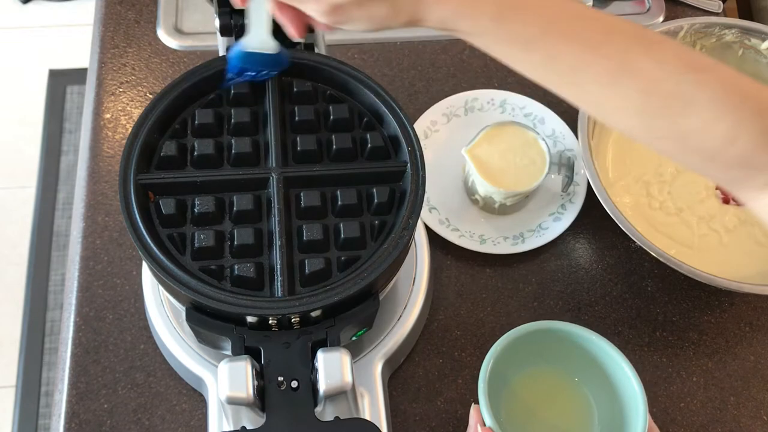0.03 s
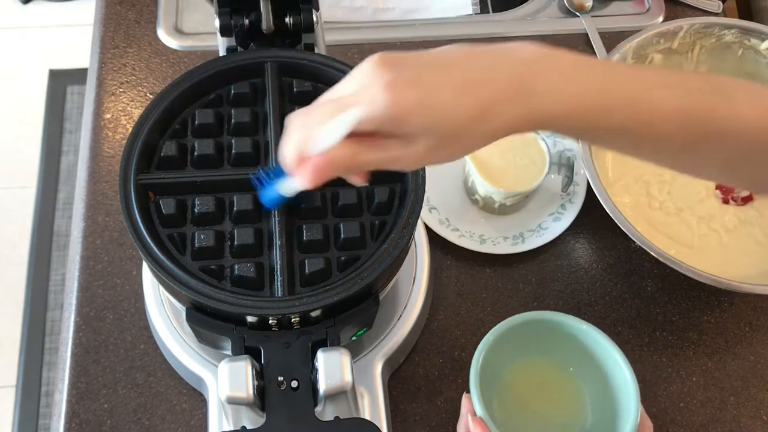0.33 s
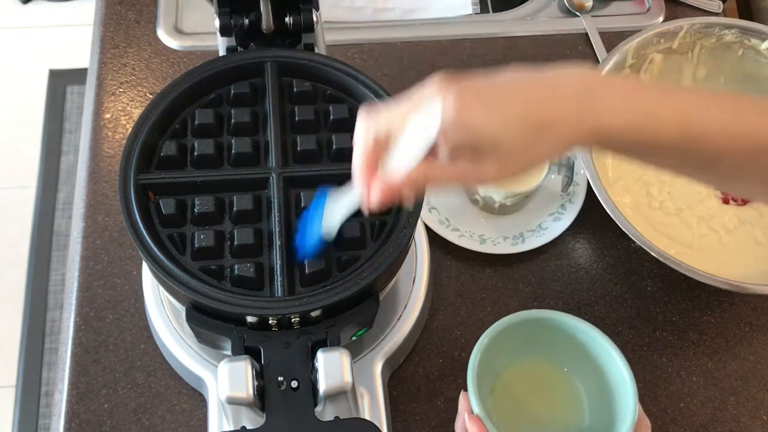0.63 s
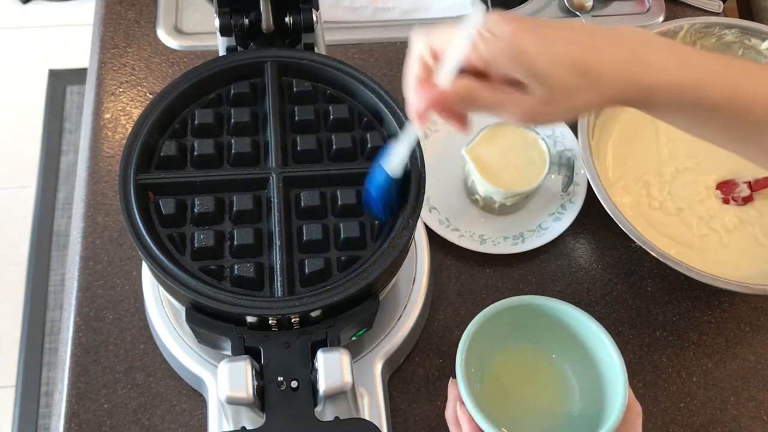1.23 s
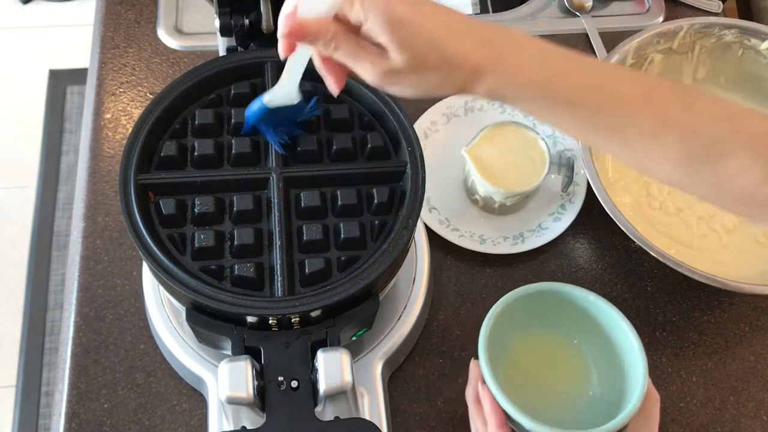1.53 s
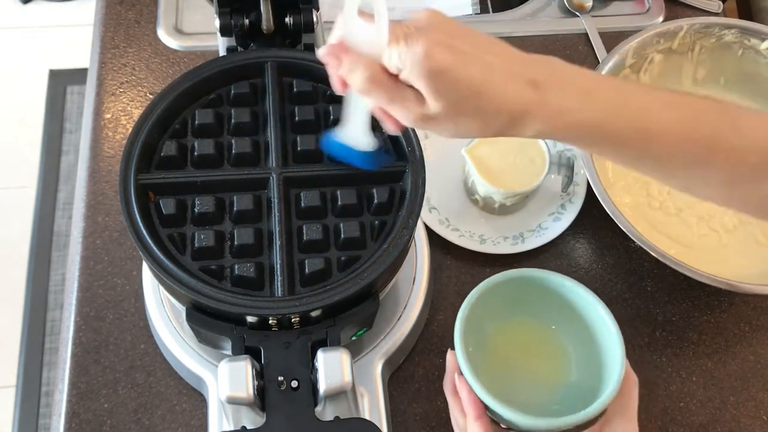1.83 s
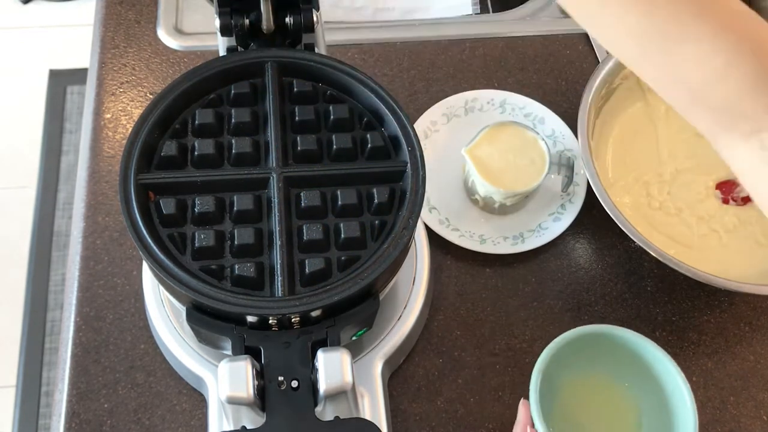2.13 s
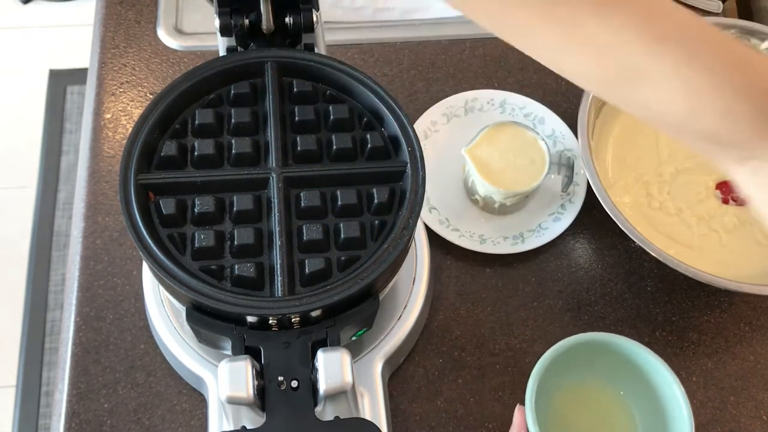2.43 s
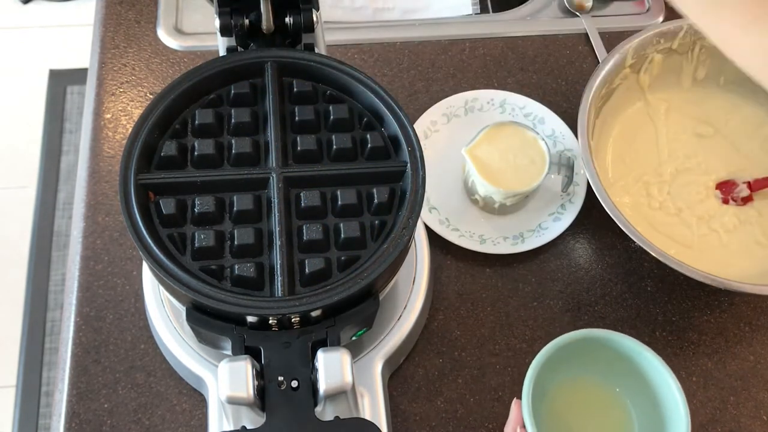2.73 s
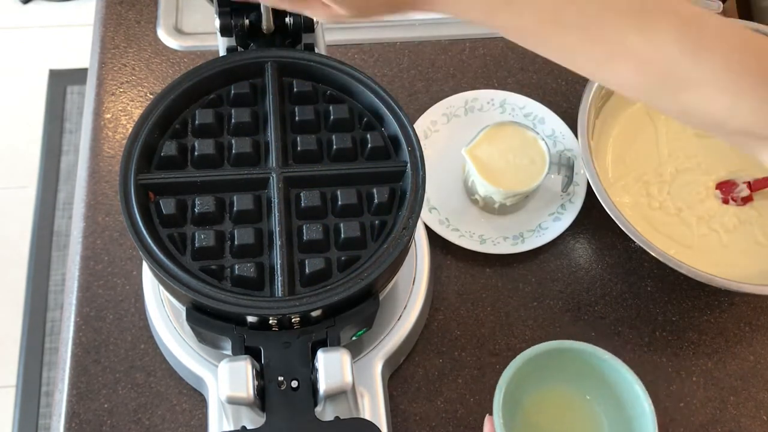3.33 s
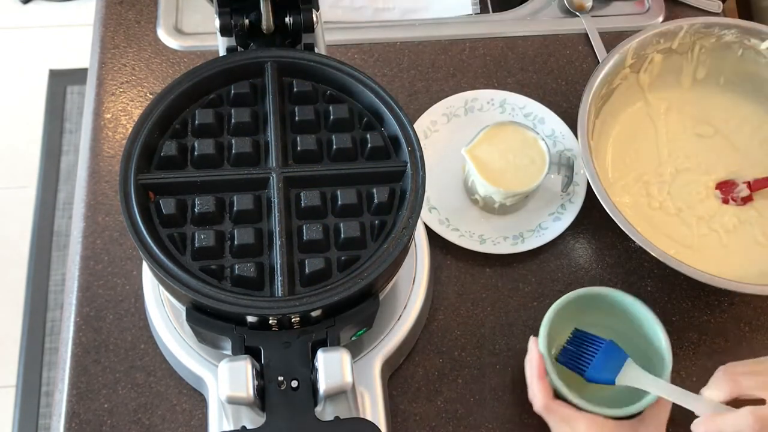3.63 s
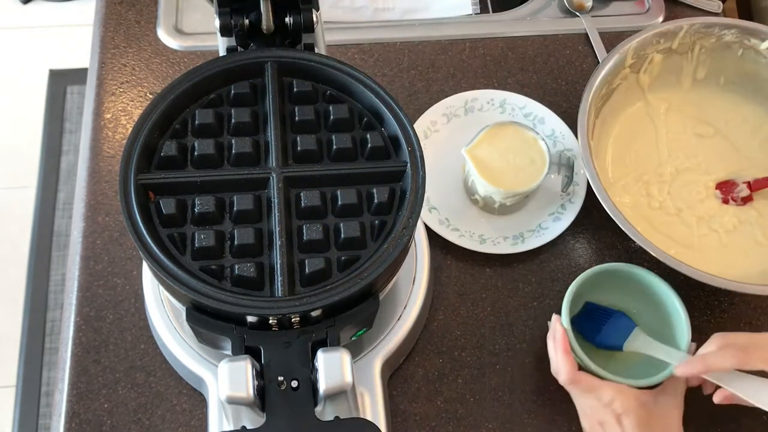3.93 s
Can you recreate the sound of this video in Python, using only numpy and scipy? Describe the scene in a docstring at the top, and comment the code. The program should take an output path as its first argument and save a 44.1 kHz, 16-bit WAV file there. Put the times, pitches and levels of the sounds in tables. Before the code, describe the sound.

A silicone brush dabs oil on a waffle iron with soft wet swishes, then scrubs more crisply over a faint appliance hum. A ceramic bowl lands on the kitchen counter with a louder, hollow knock, close to the microphone.

```python
"""A kitchen, one microphone close above the counter. Over a low room rumble, a silicone brush dabs oil
on the grid of a waffle iron: soft wet swishes, and bristles flicking off the ridges. From about 1.7 s a
crisper, drier scrubbing takes over for two seconds, above the whirr and hum of an appliance.
Near 3.9 s a ceramic bowl is set down on the counter with a hollow knock,
and the brush taps it lightly twice."""
import sys
import numpy as np
from scipy import signal
from scipy.fft import rfft, irfft
from scipy.io import wavfile
from scipy.ndimage import uniform_filter1d

SR = 44100
rng = np.random.default_rng(int(sys.argv[2]) if len(sys.argv) > 2 else 0)


def output_pcm(signal):
    """Save a mono or channel-first signal as 16-bit PCM at the path in sys.argv[1].

    Samples are clipped to [-1, 1] before scaling.
    """
    pcm = np.clip(np.atleast_2d(signal).T, -1, 1) * 32767
    wavfile.write(sys.argv[1], SR, np.round(pcm).astype(np.int16))


N = 176400
TIME = np.arange(N) / SR
HZ = np.fft.rfftfreq(N, 1 / SR)


def amp(db):
    """Decibels to gain."""
    return 10 ** (np.asarray(db) / 20)


def unit(x):
    """Scales to rms 1."""
    return x / np.sqrt(np.mean(x ** 2) + 1e-20)


def value_at(points, hz):
    """Interpolates (Hz, value) points over log frequency."""
    freqs, values = np.transpose(points)
    return np.interp(np.log(hz + 1), np.log(freqs + 1), values)


def colour(x, spectrum):
    """Filters x by (Hz, dB) points, at rms 1."""
    return unit(irfft(rfft(x) * amp(value_at(spectrum, HZ)), N))


def noise(spectrum):
    """Steady coloured noise at rms 1."""
    return colour(rng.standard_normal(N), spectrum)


def drift(rate_hz):
    """Random wander below rate_hz, at rms 1."""
    return unit(irfft(rfft(rng.standard_normal(N)) / (1 + (HZ / rate_hz) ** 4), N))


def cut(x, kind, hz, order=2):
    """Butterworth "low" or "high" pass."""
    return signal.sosfilt(signal.butter(order, hz, kind, fs=SR, output="sos"), x)


def resonate(x, hz, width_hz):
    """One resonance of gain 1; its pitch may move."""
    turn = np.exp(2j * np.pi * np.cumsum(hz * np.ones(N)) / SR)
    pole = np.exp(-np.pi * width_hz / SR)
    return 2 * (turn * signal.lfilter([1 - pole], [1, -pole], x / turn + 1e-18)).real


def swell(peak, rise, fall, skirt=1.31):
    """Pressure of one stroke: it builds, peaks and lets go."""
    t = TIME - peak
    from_peak = abs(t / np.where(t < 0, rise, fall))
    return np.exp(-.5 * np.minimum(from_peak, 20) ** skirt)


def burst(start, decay):
    """A sudden start and an exponential fall."""
    return (TIME >= start) * np.exp(-np.clip((TIME - start) / decay, 0, 20))


def die_away(x, start):
    """Lets each band fade at the kitchen's own rate."""
    # Each row: frequency in Hz, seconds to fall 60 dB.
    room_t60 = [(100, 0.75), (500, 0.45), (2000, 0.71), (6000, 0.29), (16000, 0.27)]
    hz, t, bands = signal.stft(x, SR, nperseg=256)
    fade = 10 ** (-3 * np.maximum(t - start, 0) / value_at(room_t60, hz)[:, None])
    return signal.istft(bands * fade, SR, nperseg=256)[1][:len(x)]


def kitchen(x, wet_db):
    """Adds diffuse reflections, reaching the microphone from 3 ms after the direct sound."""
    tail = die_away(rng.standard_normal(SR // 2), 0) * (TIME[:SR // 2] > .003)
    return x + amp(wet_db) * signal.fftconvolve(x, tail / np.linalg.norm(tail))[:N]


def hum(hz, waver, waver_hz, sway_rad, sway_hz):
    """A tone at rms 1 whose level wavers and whose phase sways."""
    level = 1 + waver * drift(waver_hz)
    return unit(level * np.sin(2 * np.pi * hz * TIME + sway_rad * drift(sway_hz)))


def room_rumble():
    """The quiet kitchen: low noise and mains hum."""
    # Each row: frequency in Hz, relative level in dB.
    spectrum = [(20, -20), (40, -7), (60, -12), (85, -4), (150, -6.5), (250, -3), (400, -12), (700, -15.5),
                (1500, -18.5), (4000, -25.5), (16000, -32)]
    rumble = amp(-59.5) * noise(spectrum)
    return rumble + amp(-61.5) * hum(58.3, waver=.3, waver_hz=12, sway_rad=.76, sway_hz=3.9)


def appliance(rise_s=.4):
    """A fan whirrs, and two humming tones come in one after the other."""
    # Each row: frequency in Hz, relative level in dB.
    fan_spectrum = [(50, -58), (95, -8), (130, -13), (190, -2), (270, -11), (480, -13), (700, -7),
                    (1100, -12), (1500, -20.5), (4000, -24.5), (9000, -29), (16000, -32)]
    # Each row: pitch in Hz, level in dB, time in seconds when it is fully there.
    hum_tones = [(174.8, -63.5, 1.75), (357, -69, 2.37)]
    tones = np.zeros(N)
    for hz, db, full in hum_tones:
        level = amp(db) * np.clip(1 + (TIME - full) / rise_s, 0, 1)
        tones += level * hum(hz, waver=.27, waver_hz=1.9, sway_rad=.27, sway_hz=4.8)
    return amp(-59.5) * noise(fan_spectrum) + tones


def background(on_s=1.684, off_s=3.653, fade_s=.068):
    """At 1.68 s the background changes abruptly from the quiet rumble to a whirr and hum, and at 3.65 s the
    rumble is back; the level dips at each change."""
    def fade_in(start):
        return np.clip((TIME - start) / fade_s + .029, 0, 1) * (TIME > start)
    rumble = room_rumble() * ((TIME < on_s) + fade_in(off_s))
    return rumble + appliance() * fade_in(on_s) * (TIME < off_s)


def ceramic_ring(start, db):
    """The bowl's thin high ring after one touch."""
    # Each row: pitch in Hz, level relative to the touch in dB, seconds to fall 60 dB.
    modes = [(1880, -20, .25), (7800, -25, .08), (12930, -38, .22)]
    return sum(amp(db + mode_db) * burst(start, t60 / np.log(1000))
               * np.sin(2 * np.pi * hz * (TIME - start)) for hz, mode_db, t60 in modes)


def bowl_taps(decay_s=.0014):
    """The brush ticks against the bowl, which rings faintly."""
    # Each row: start in seconds, level in dB.
    taps = [(3.961, -25), (3.976, -28)]
    # Each row: frequency in Hz, relative level in dB.
    tick_spectrum = [(500, -33), (1800, 6.5), (2700, 1), (4000, 1), (5500, 4.5), (7000, -4), (7800, 1),
                     (9000, -6), (16000, -27)]
    tick = noise(tick_spectrum)
    return sum(amp(db) * burst(start, decay_s) * tick + ceramic_ring(start, db) for start, db in taps)


def bowl_knock(attack_s=.001, clack_hz=930, clack_s=.0008, tail_rise_s=.0022):
    """The bowl lands with a clack, rocks and grates briefly; the counter and room ring."""
    # Each row: start in seconds, strength in dB, contact time in seconds.
    blows = [(3.8586, -13.5, 0.00026), (3.867, -15.5, 0.0013), (3.888, -25.5, 0.00083)]
    # Bowl and counter together. Each row: pitch in Hz, relative level in dB, seconds to fall 60 dB.
    modes = [(215.3, -21.5, 0.33), (292, -8, 0.56), (360, -12, 0.36), (534.6, -7, 0.37), (600, -4, 0.11),
             (684, -19, 0.21), (843, -17, 0.21), (944, -23, 0.14), (1077, -21, 0.06), (1168, 0, 0.026),
             (1350, -21.5, 0.21), (2105, -13.5, 0.048), (3950, -4, 0.021)]
    # The room's ring and the grating. Each row: frequency in Hz, relative level in dB.
    tail_spectrum = [(40, -22), (95, -6), (160, -9), (270, 4.5), (430, 2.5), (540, 7.5), (850, 0),
                     (1200, -7), (1550, -12.5), (2100, -19.5), (6500, -28.5), (16000, -51)]
    grit_spectrum = [(1000, 2), (2000, 6.5), (4500, 4), (7800, -6), (8900, 3.5), (10300, -16), (11500, -5),
                     (16000, -16)]
    landing, hollow = blows[0][0], np.zeros(N)
    for start, db, contact in blows:
        t = np.maximum(TIME - start, 0)
        blow = amp(db) * (1 - np.exp(-t / attack_s))
        for hz, mode_db, t60 in modes:
            mode = amp(mode_db) * np.exp(-np.log(1000) * t / t60) * np.sin(2 * np.pi * hz * t)
            hollow += blow * mode / (1 + (2 * hz * contact) ** 2)  # longer contact sounds duller
    t = TIME - landing - .00085  # the clack peaks just after the landing
    clack = amp(-9) * np.exp(-.5 * (t / clack_s) ** 2) * np.cos(2 * np.pi * clack_hz * t)
    body = cut(hollow + clack, "high", hz=148)
    tail = amp(-24.5) * die_away(noise(tail_spectrum), landing)
    tail *= np.clip((TIME - landing) / tail_rise_s, 0, 1)
    grating = swell(landing + .0065, rise=.0025, fall=.0064) * (TIME > landing)
    grit = amp(-35.5) * noise(grit_spectrum) * grating
    snap = unit(cut(rng.standard_normal(N), "low", hz=4500, order=10))
    crack = amp(-23) * burst(landing - clack_s, decay=.0014) * snap
    return body + crack + tail + grit + ceramic_ring(landing, db=-26)


def bristle_slips(per_s, spread_db, flutter_db):
    """Tiny slips of many bristles: random clicks of uneven, fluttering strength."""
    hits = (rng.random(N) < per_s / SR) * rng.choice([-1, 1], N)
    return hits * amp(spread_db * np.minimum(rng.exponential(1, N), 4) + flutter_db * drift(168))


def snags(per_s=140, decay_s=.0006, surge_db=5):
    """Single bristles catch and let go: brief surges within a stroke, at rms 1."""
    spacing = SR / per_s
    at = np.cumsum(spacing * rng.gamma(2, .5, int(2 * N / spacing))).astype(int)
    hits = np.zeros(N)
    hits[at[at < N]] = 1
    surge = signal.lfilter([1], [1, -np.exp(-1 / (decay_s * SR))], hits * (.5 + rng.random(N)))
    return unit(1 + amp(surge_db) * surge)


def patchy(x, depth_db=3, patch_hz=900, patch_s=.012):
    """Every contact has its own colour: random patches in time and frequency."""
    hz, t, bands = signal.stft(x, SR, nperseg=128)
    patches = uniform_filter1d(rng.standard_normal(bands.shape), round(patch_hz / hz[1]), axis=0)
    patches = unit(uniform_filter1d(patches, round(patch_s / t[1]), axis=1))
    return unit(signal.istft(bands * amp(depth_db * patches), SR, nperseg=128)[1][:N])


def stroke_envelopes(strokes):
    """Strokes add in power: one envelope for the rubbing, one for the spray or ring it sets off."""
    rub_power, side_power = np.zeros((2, N))
    for peak, rise, fall, db, side_db in strokes:
        power = (amp(db) * swell(peak, rise, fall)) ** 2
        rub_power += power
        side_power += power * amp(side_db) ** 2
    return np.sqrt(rub_power), np.sqrt(side_power)


def wandering_ring(drive, modes, wander=.012):
    """Driven resonances, each drifting slightly in pitch."""
    return sum(amp(db) * resonate(drive, hz * (1 + wander * drift(rate_hz=12)), width)
               for hz, width, db in modes)


def bristle_flicks(gain_db=7, rise_s=.00015):
    """Bristles spring off a ridge: a broad snap and a brief pitched tick."""
    # Each row: start in seconds, level before gain in dB, pitch in Hz, snap relative to tick in dB.
    flicks = [(.0095, -49, 6960, 4), (.06, -47, 2480, -20), (0.1475, -46.5, 3950, -15),
              (0.149, -47.5, 8700, -9), (.571, -41.5, 6160, -1), (0.6112, -46.5, 6070, -4.5),
              (0.744, -57, 5870, 2), (0.7602, -47, 6300, 7.5), (0.862, -48, 6170, 2),
              (1.0483, -38.5, 6040, -2.5), (1.277, -47, 6200, 1), (1.288, -49.5, 6000, 3),
              (1.3223, -45.5, 4000, -1), (1.414, -49.5, 2950, -8), (1.549, -47, 7000, 3),
              (1.9806, -44, 4630, -9), (1.9787, -49, 880, -9)]
    # Each row: frequency in Hz, relative level in dB.
    snap_spectrum = [(300, -35), (1500, -6.5), (3000, -10.5), (4600, -5), (6200, -6), (9000, -7.5),
                     (16000, -8.5)]
    snap, white, out = noise(snap_spectrum), rng.standard_normal(N), np.zeros(N)
    for start, db, hz, snap_db in flicks:
        shape = burst(start, decay=.0014) * np.clip((TIME - start) / rise_s, 0, 1)
        tick = np.sin(2 * np.pi * hz * (TIME - start)) + unit(resonate(white, hz, width_hz=157))
        out += amp(db + gain_db) * shape * (unit(tick) + amp(snap_db) * snap)
    return out


def dry_scrubs():
    """Short scratchy strokes set a few shifting resonances ringing; single crackles snap among them."""
    # Each row: peak time, rise and fall in seconds, level in dB, ring relative to it in dB.
    strokes = [(1.728, 0.0075, 0.0057, -57.5, -15), (1.812, 0.02, 0.0075, -57.5, -5),
               (1.858, 0.01, 0.013, -50.5, -8.5), (2.157, 0.0021, 0.0045, -48, -5),
               (2.175, 0.0043, 0.0059, -41.5, -3), (2.212, 0.0035, 0.0079, -39.5, -4.5),
               (2.23, 0.0047, 0.0053, -48.5, -5), (2.297, 0.0059, 0.0047, -40.5, -4.5),
               (2.315, 0.004, 0.005, -45, -3), (2.352, 0.0079, 0.005, -52, -5),
               (2.375, 0.0026, 0.0099, -51.5, -8), (2.455, 0.0027, 0.0057, -43, -0.5),
               (2.49, 0.013, 0.0056, -55, -1), (2.526, 0.0061, 0.011, -49.5, -5),
               (2.555, 0.011, 0.012, -49, -6), (2.623, 0.0071, 0.0074, -43.5, -10),
               (2.641, 0.011, 0.013, -47, -7), (2.697, 0.0018, 0.0069, -48, -9.5),
               (2.763, 0.02, 0.0049, -47.5, -12.5), (2.784, 0.0028, 0.0054, -51.5, -5.5),
               (2.816, 0.0082, 0.012, -55, -14), (2.877, 0.0029, 0.015, -50.5, -13.5),
               (3.0, 0.07, 0.029, -63, -7.5), (3.085, 0.012, 0.0052, -54.5, -12),
               (3.107, 0.0074, 0.003, -53.5, -15), (3.123, 0.0024, 0.0043, -50.5, -11.5),
               (3.161, 0.0051, 0.0053, -49, -21), (3.188, 0.011, 0.0041, -53, -14),
               (3.212, .008, 0.0077, -55.5, -23), (3.255, 0.011, 0.016, -57, -9),
               (3.31, 0.0044, 0.0077, -42, -11.5), (3.355, 0.0091, 0.015, -55, -5.5),
               (3.403, 0.012, 0.0051, -53, -2), (3.421, 0.0076, 0.0099, -46, -8.5)]
    # Each row: frequency in Hz, relative level in dB.
    rasp_spectrum = [(50, -32), (400, 7.5), (1400, -44), (2500, -5), (3200, -7), (5400, -1.5), (6500, -2.5),
                     (8100, 3), (10000, -3), (11800, 0.5), (16000, -9.5)]
    # What rings under the brush. Each row: pitch in Hz, width in Hz, relative level in dB.
    low_modes = [(1820, 39, 6), (1900, 35, 0.5), (1936, 34, 2)]
    high_modes = [(2883, 55, 0), (3690, 170, -6), (4260, 58, 1), (4530, 74, -11), (7600, 100, -11),
                  (8530, 300, -16)]
    # Each row: time in seconds, gain of the high modes in dB.
    high_gain_curve = [(2.2, -10), (2.46, -4.5), (2.6, 6.5), (2.8, 12.5), (3.15, 6.5), (3.35, 0)]
    # Each row: start in seconds, level in dB.
    crackle_hits = [(1.769, -45), (1.7738, -46), (1.791, -53), (1.899, -47), (1.9495, -45.5), (1.956, -47),
                    (2.451, -43), (2.4915, -50), (2.524, -44), (2.558, -42), (2.695, -44), (2.8975, -49)]
    rasp_level, ring_level = stroke_envelopes(strokes)
    slips = bristle_slips(per_s=14000, spread_db=4.5, flutter_db=1.5)
    low = wandering_ring(slips * ring_level, low_modes)
    high = wandering_ring(slips * ring_level, high_modes)
    high *= amp(np.interp(TIME, *np.transpose(high_gain_curve)))
    ring = np.sqrt(np.mean(ring_level ** 2)) * unit(low + high)
    crackles = sum(amp(db) * burst(start, decay=.0015) for start, db in crackle_hits)
    rasp = (rasp_level * snags() + crackles) * patchy(colour(slips, rasp_spectrum))
    return cut(rasp + ring, "high", hz=790)


def wet_swishes():
    """Oily bristles drag over the grid and stir the plate, with a fine spray of crackle on top."""
    # Each row: peak time, rise and fall in seconds, level in dB, spray relative to it in dB.
    strokes = [(.036, 0.066, 0.022, -66, 10.5), (0.143, 0.0084, 0.015, -52, -17),
               (0.362, 0.0052, 0.01, -48, -21), (0.389, 0.0021, 0.0061, -47, -13),
               (.525, 0.015, 0.012, -60, -18), (.682, 0.013, 0.016, -58.5, 0),
               (0.727, 0.0085, 0.0069, -46, -4), (0.776, 0.018, 0.0088, -51.5, -7),
               (0.867, 0.014, .012, -55, -7.5), (0.921, 0.0091, 0.02, -57, -9),
               (1.024, 0.0094, 0.018, -60.5, 5.5), (1.057, 0.0096, 0.019, -48.5, -6.5),
               (1.102, .015, 0.015, -49, -9.5), (1.279, 0.0096, .018, -54, -5),
               (1.332, 0.017, 0.026, -45, -9.5), (1.436, 0.011, 0.014, -53, -26),
               (1.468, 0.0037, 0.0047, -54, -15), (1.552, 0.0042, 0.0069, -57, -17),
               (1.603, 0.0048, 0.011, -54, -6), (1.627, 0.00047, 0.01, -43, -17),
               (1.664, 0.015, 0.004, -59, 1.5), (1.678, 0.01, 0.001, -47.5, -10)]
    # The iron's plate. Each row: pitch in Hz, width in Hz, relative level in dB.
    plate_modes = [(1723, 78, 5), (2430, 400, 0.5), (4100, 260, 4.5), (6050, 250, -23)]
    # Each row: frequency in Hz, relative level in dB.
    drag_spectrum = [(150, -16), (500, 0.5), (1100, -2.5), (1700, 2), (2200, -2), (2800, 7.5), (4200, -2),
                     (5200, -6.5), (6200, 0.5), (7800, -24.5), (16000, -51)]
    spray_spectrum = [(500, -38), (3000, -44), (6000, 8.5), (7900, 3.5), (9200, 8.5), (10500, -2),
                      (12500, 5), (16000, -3)]
    body_level, spray_level = stroke_envelopes(strokes)
    slips = bristle_slips(per_s=8200, spread_db=6, flutter_db=-.5)
    plate = unit(sum(amp(db) * resonate(slips, hz, width) for hz, width, db in plate_modes))
    crackle = bristle_slips(per_s=1500, spread_db=4.2, flutter_db=2)
    drag = patchy(colour(np.roll(slips, SR), drag_spectrum))  # shifted to be independent of the plate
    spray = snags() * patchy(colour(crackle, spray_spectrum))
    return body_level * unit(drag + amp(-3) * plate) + spray_level * spray


def scene():
    """Brush, bowl and kitchen at one microphone above the counter."""
    brush = kitchen(wet_swishes(), wet_db=-17)
    brush += kitchen(bristle_flicks(), wet_db=-13.5)
    brush += kitchen(dry_scrubs(), wet_db=-16.5)
    bowl = bowl_knock() + kitchen(bowl_taps(), wet_db=-8.5)
    return (brush + bowl + background())[None]


def record(dry):
    """The recorder cuts the treble above 16.1 kHz."""
    low_pass = signal.firwin(401, 16100, window=("kaiser", 8), fs=SR)
    return signal.oaconvolve(dry, low_pass[None], "same")


dry = scene()
out = record(dry)
output_pcm(out)
```